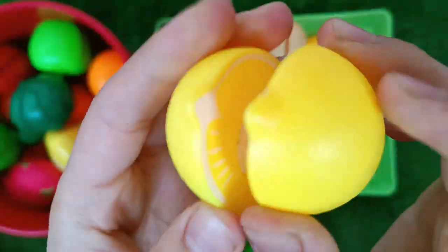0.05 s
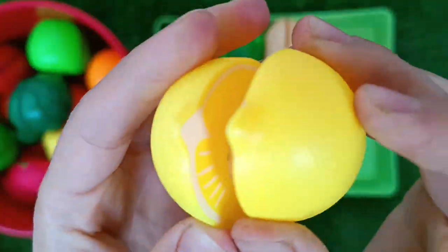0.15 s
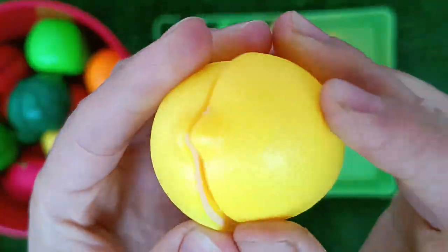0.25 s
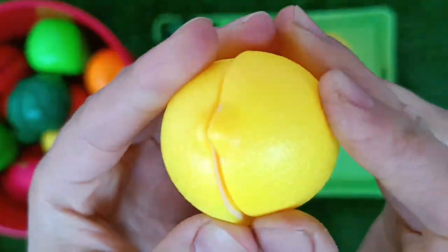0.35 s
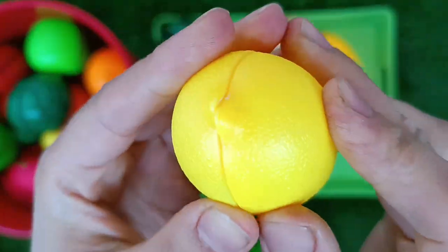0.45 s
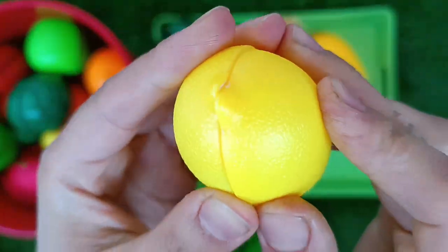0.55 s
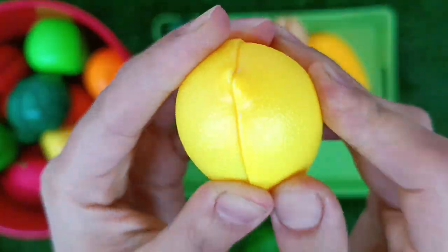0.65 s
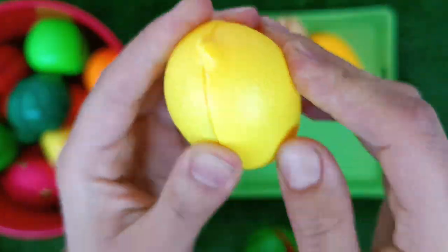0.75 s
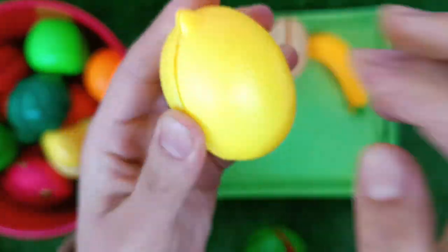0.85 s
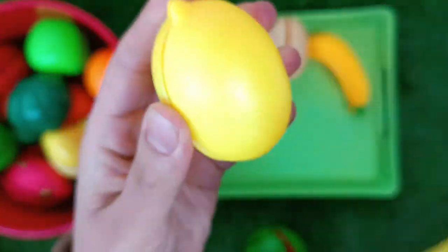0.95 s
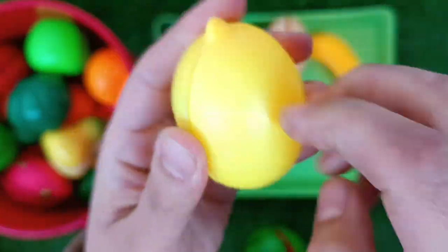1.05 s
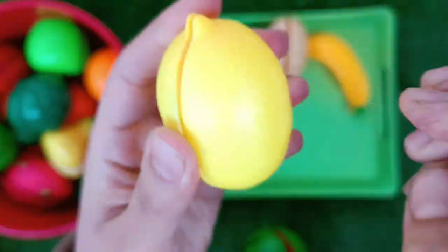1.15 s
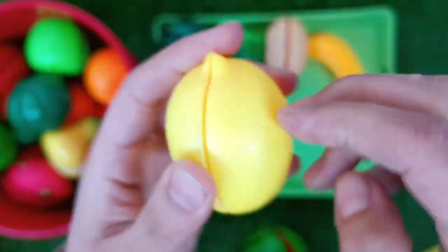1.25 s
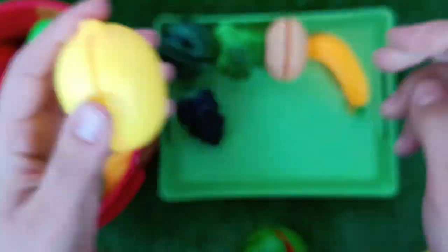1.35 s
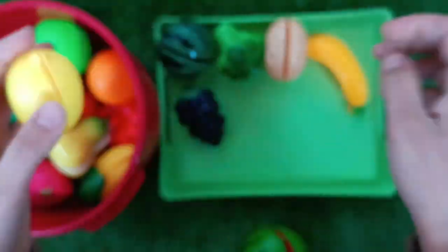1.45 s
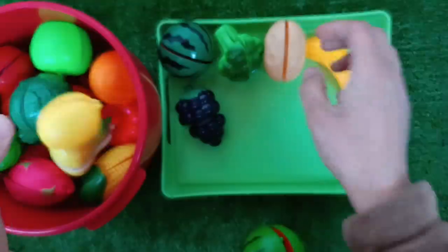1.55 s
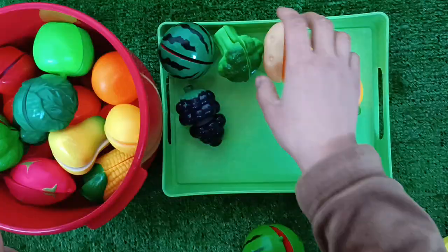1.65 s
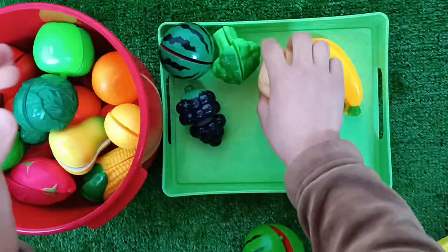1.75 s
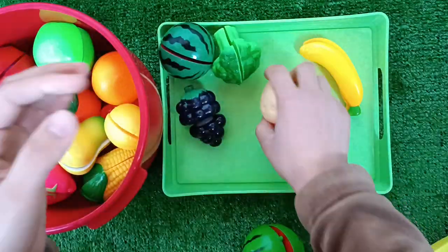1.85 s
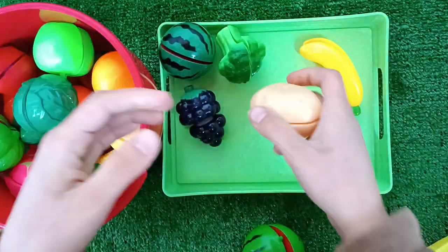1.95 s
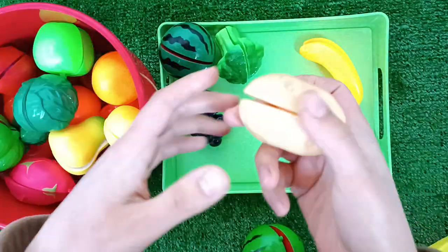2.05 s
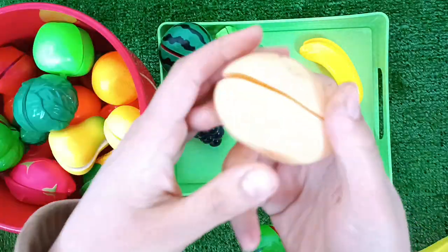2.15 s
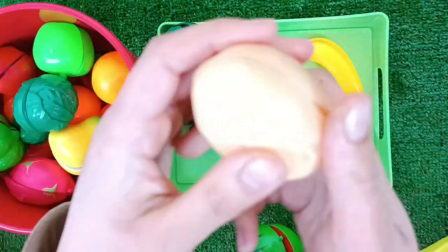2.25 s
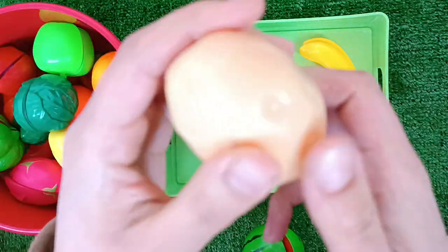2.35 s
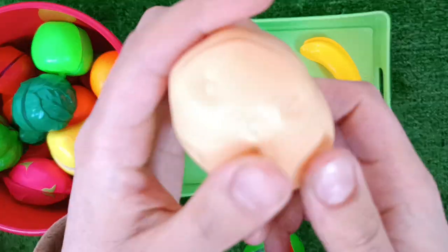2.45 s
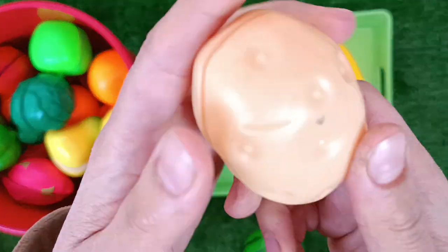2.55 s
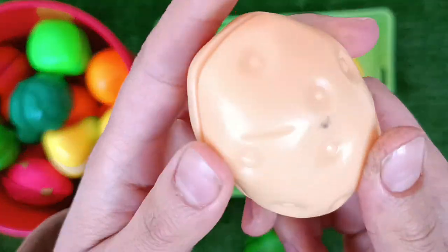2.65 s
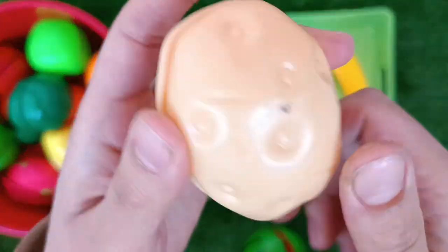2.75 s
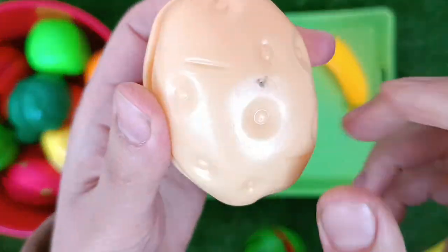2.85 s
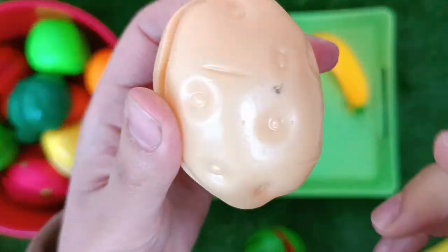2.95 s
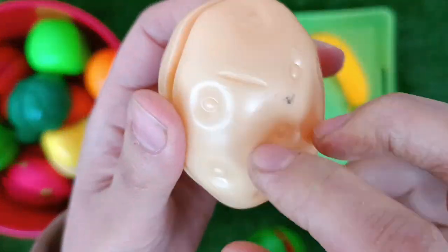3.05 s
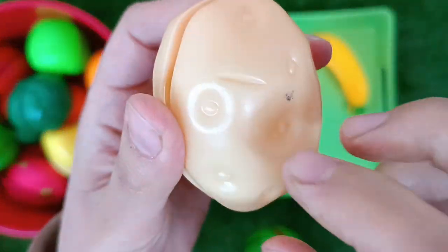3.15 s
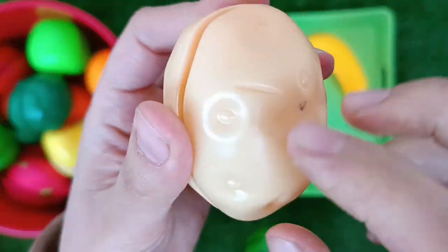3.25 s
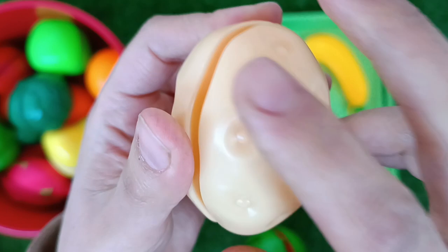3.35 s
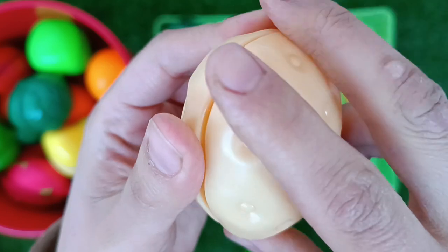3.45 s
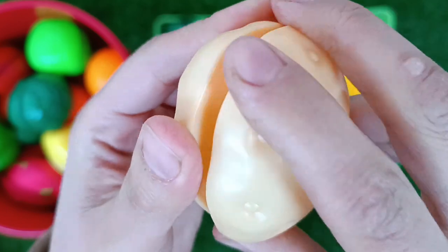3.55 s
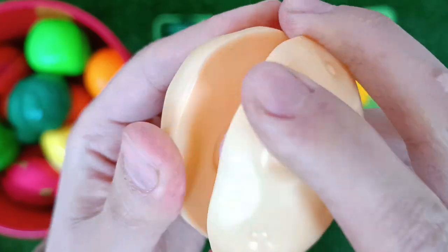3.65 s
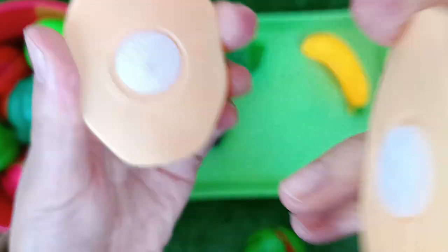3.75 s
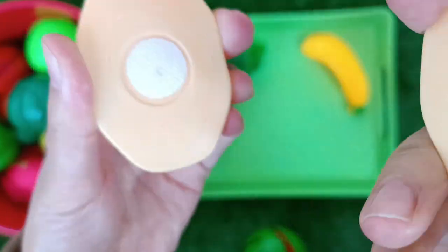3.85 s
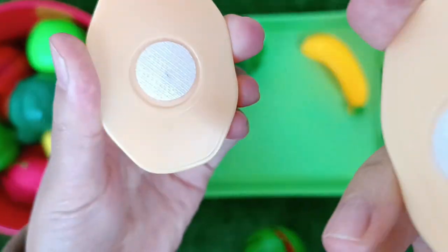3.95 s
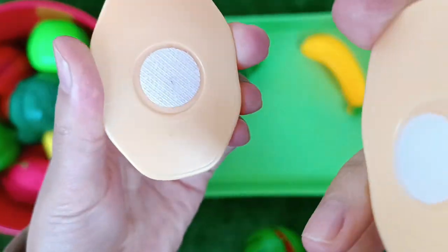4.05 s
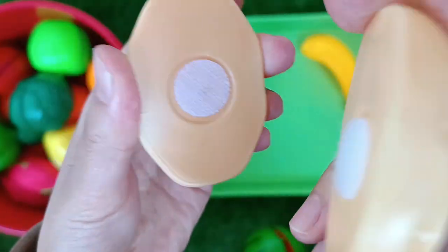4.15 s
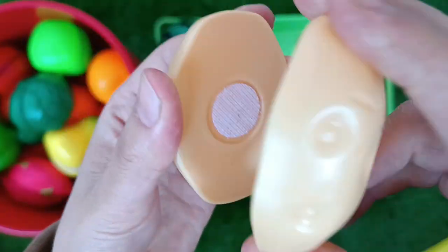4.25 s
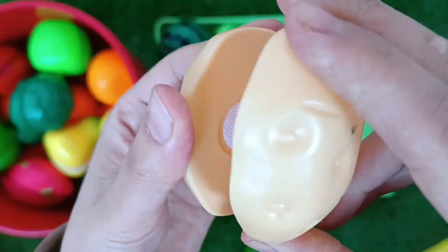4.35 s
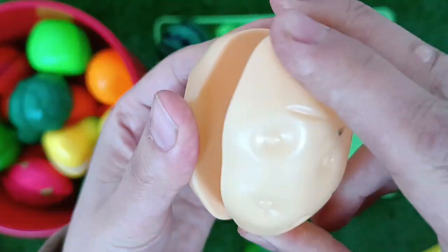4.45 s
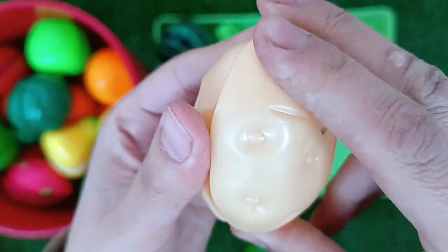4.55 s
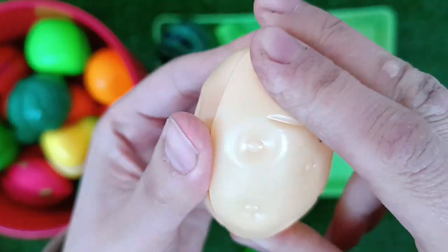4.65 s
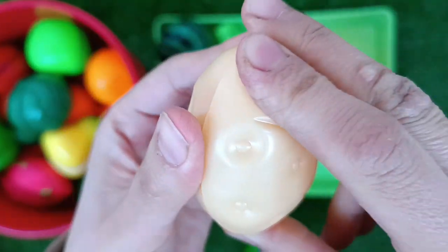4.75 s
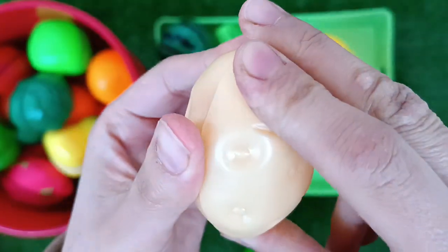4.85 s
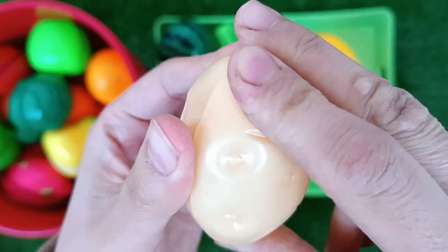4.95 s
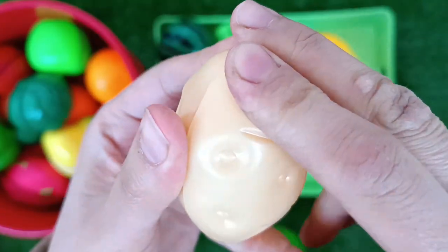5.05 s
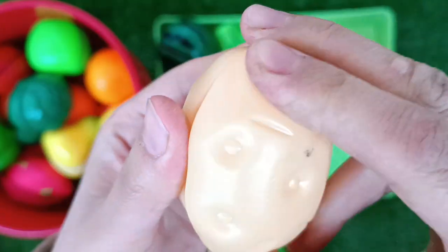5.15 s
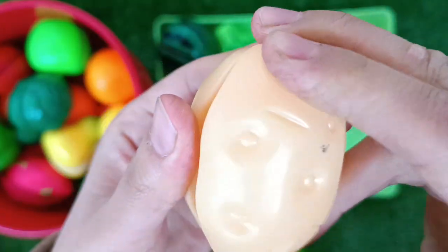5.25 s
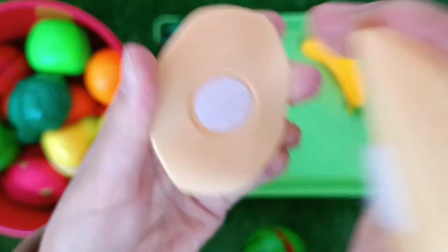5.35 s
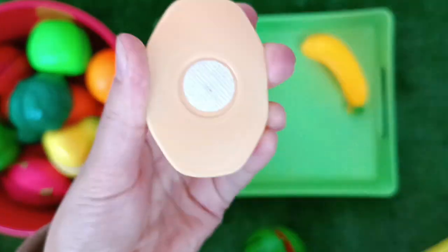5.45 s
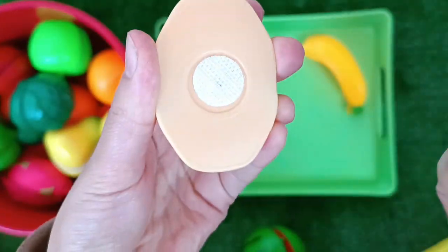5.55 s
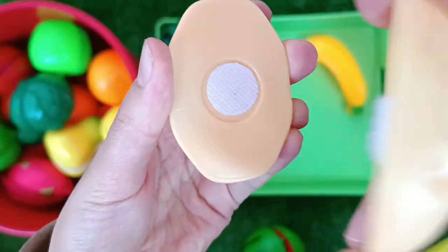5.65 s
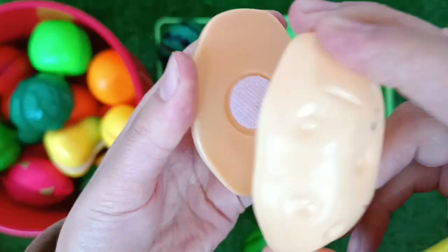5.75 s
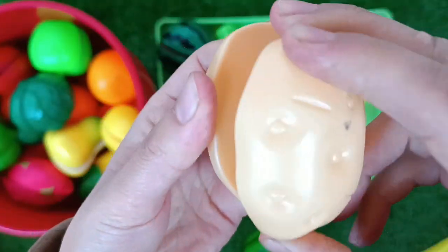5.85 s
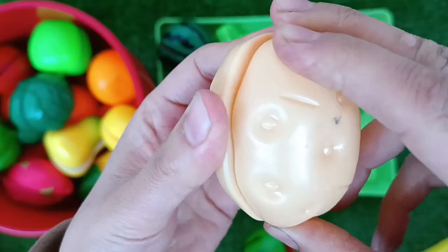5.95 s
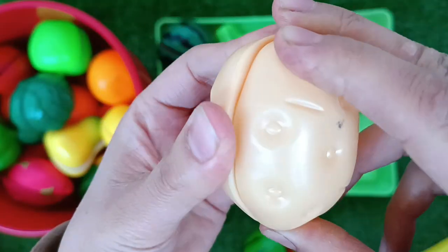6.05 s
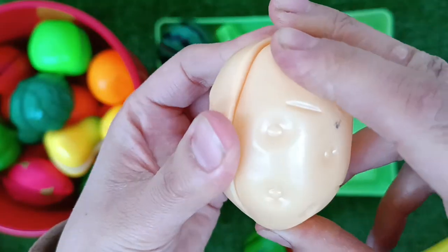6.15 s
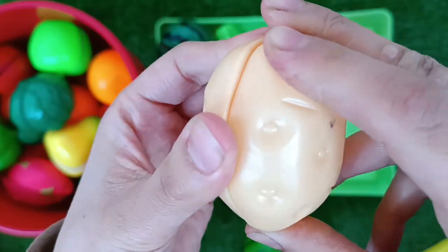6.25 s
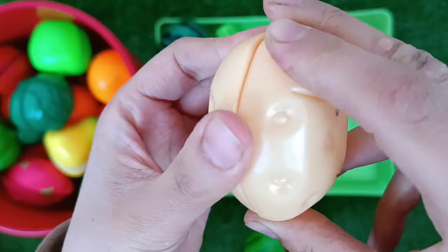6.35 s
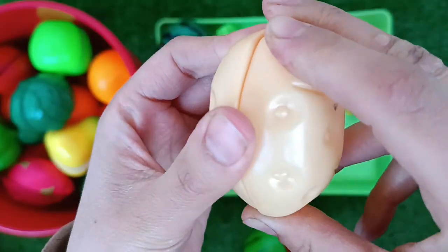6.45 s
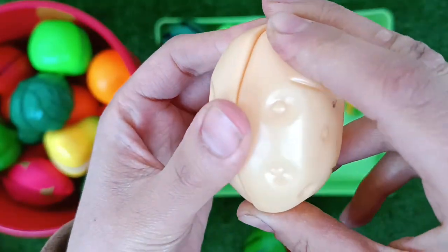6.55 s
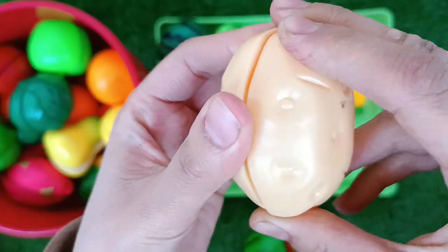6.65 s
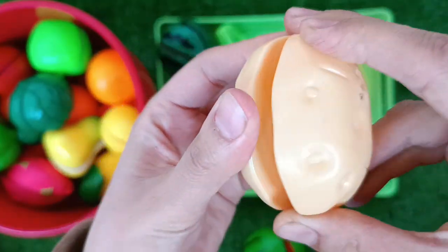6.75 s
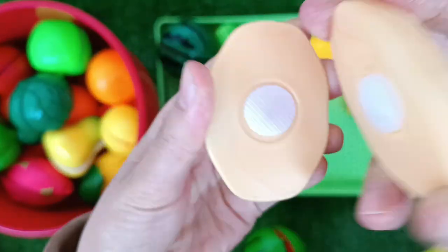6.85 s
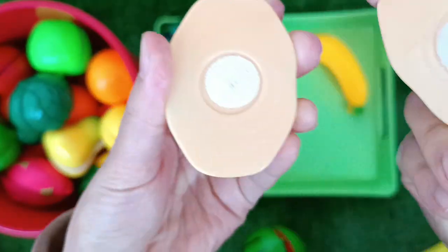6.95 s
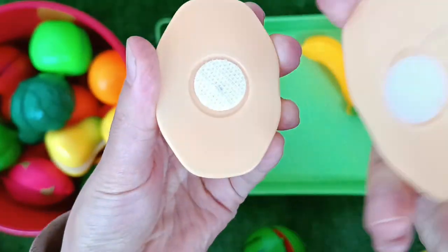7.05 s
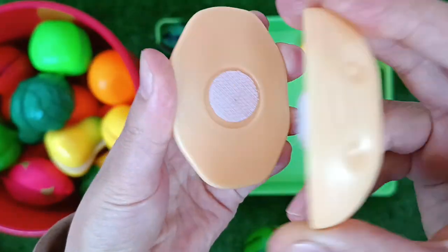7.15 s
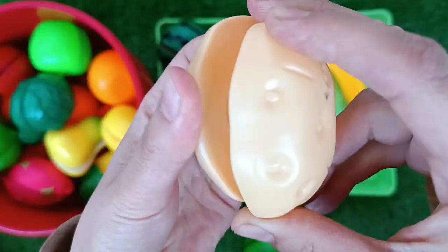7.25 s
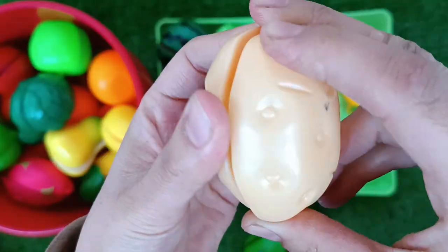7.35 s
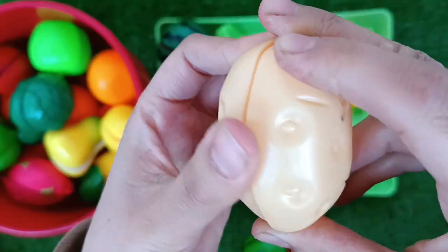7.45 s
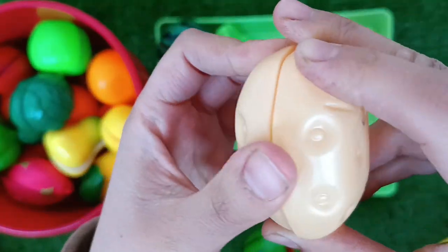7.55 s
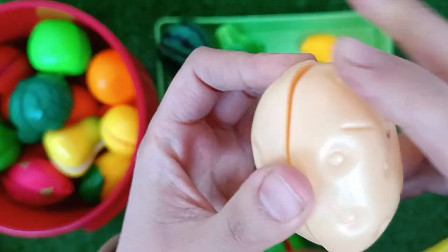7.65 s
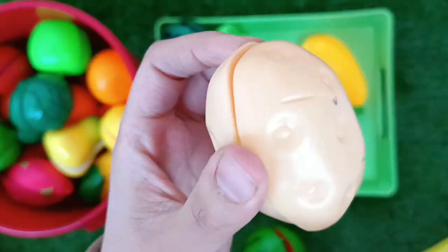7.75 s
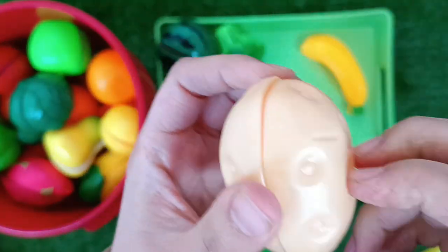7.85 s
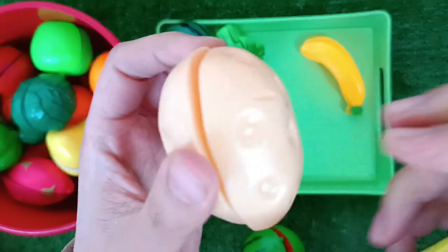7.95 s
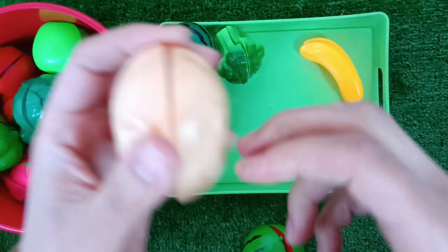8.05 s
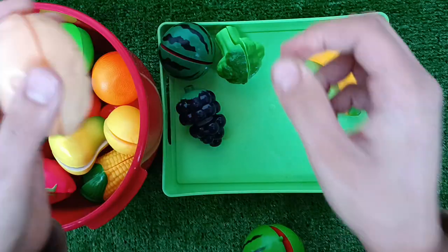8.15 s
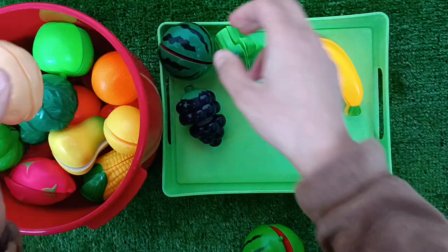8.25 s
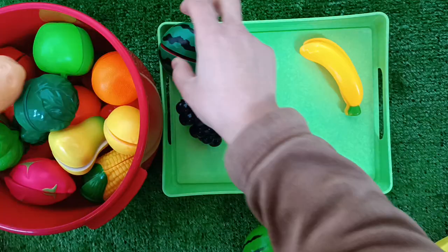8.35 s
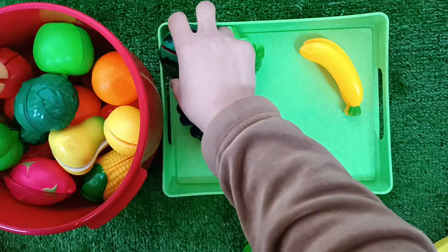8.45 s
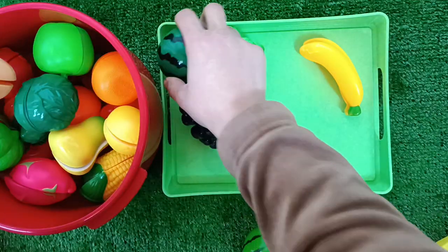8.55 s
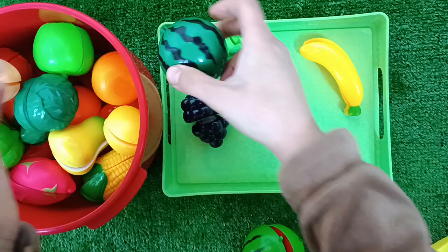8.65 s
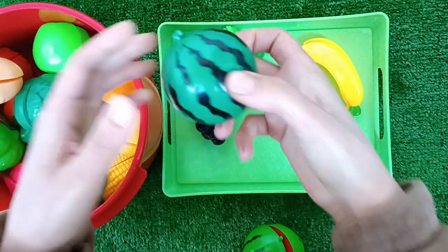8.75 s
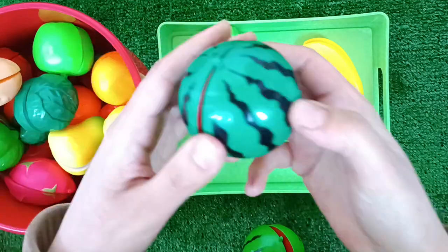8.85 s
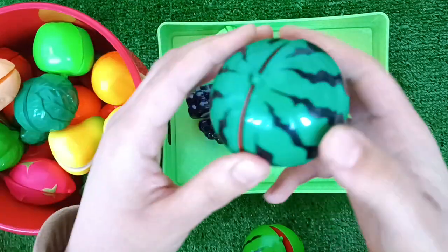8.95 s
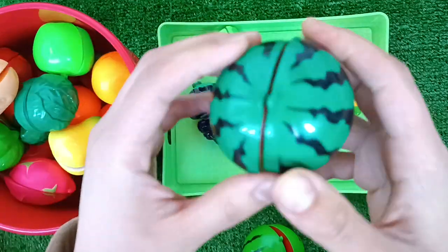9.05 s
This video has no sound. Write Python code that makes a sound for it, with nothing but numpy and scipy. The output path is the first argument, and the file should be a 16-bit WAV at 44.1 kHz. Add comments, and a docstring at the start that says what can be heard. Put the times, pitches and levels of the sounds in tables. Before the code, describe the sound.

Hands tap, drop and snap apart hollow plastic toy food up close; brief crackling fastener tears, sharp clicks, faint distant traffic behind.

```python
"""Small room: hands tap, rub and pull apart hollow plastic toy fruit close to a phone with two ports.
Knocks, pieces dropped into a basket and tearing hook-and-loop pads are damped shell modes with a crack
and a thud; rubbing is clumped noise impulses, a sliding fingertip band-passed hiss.
The room answers with sparse decaying echoes. Outside: far traffic, a faint horn, still air, wavering tones.
Capture adds a limiter, a noise suppressor and a band limit."""
import sys
import numpy as np
from scipy import signal
from scipy.fft import rfft, irfft, next_fast_len
from scipy.io import wavfile
from scipy.ndimage import uniform_filter1d

SR = 44100
rng = np.random.default_rng(int(sys.argv[2]) if len(sys.argv) > 2 else 0)


def digitize_waveform(pressure):
    """Quantize a signal to 16-bit integers and store it at the path in sys.argv[1].

    Rows of a 2-D input are taken as channels; values are limited to [-1, 1].
    """
    field = np.atleast_2d(pressure).T
    bounded = np.clip(field, -1, 1)
    quanta = np.round(bounded * 32767).astype(np.int16)
    wavfile.write(sys.argv[1], SR, quanta)


N = 400428

USUAL_LAG_SAMPLES = 9  # right port hears later
PAN_DB_PER_SAMPLE = 0.35  # left-right level difference per sample of lag


def gain_of(db):
    """Amplitude factor of a level in dB."""
    return 10 ** (np.asarray(db) / 20)


def evened(x):
    """Scales to RMS 1."""
    return x / np.sqrt(np.mean(x ** 2) + 1e-20)


def read(points, hz):
    """Interpolates a (hz, value) curve over log frequency."""
    point_hz, value = np.transpose(points)
    return np.interp(np.log(hz + 1), np.log(point_hz + 1), value)


def equalized(x, points):
    """Zero-phase filter with a (hz, level_db) curve."""
    size = next_fast_len(N)
    gain = gain_of(read(points, np.fft.rfftfreq(size, 1 / SR)))
    return irfft(rfft(x, size) * gain, size)[..., :N]


def coloured(x, points):
    """Filtered by a spectrum, then scaled to RMS 1."""
    return evened(equalized(x, points))


def smooth_noise(count, width_samples):
    """Slow random curve of RMS 1: moving average of noise."""
    return evened(uniform_filter1d(rng.standard_normal(count), width_samples))


def add(mix, start_s, sound):
    """Adds a sound in place, cut at the end of the mix."""
    part = mix[:, round(start_s * SR):][:, :sound.shape[1]]
    part += sound[:, :part.shape[1]]


def toys():
    """All blows and tearing hooks as left, right and room feed; each blow rebounds once, softer."""
    # knocks of nails and toys on hollow shells: start_s, level_db, main_ring_hz, thud_db, brightness_db
    knocks = [(0.3475, -16.5, 1650, -60, -6.5), (.445, -36, 2180, -42, 10.5), (.473, -33, 2260, -47, 7.5),
              (0.519, -23.5, 2170, -38, -1.5), (0.568, -42, 2480, -28, 11.5),
              (0.6287, -26, 2180, -13.5, -4.5), (0.6501, -27.5, 2156, -23, 3),
              (0.697, -54.5, 2800, -4, 20.5), (0.8733, -36.5, 2310, -11, 0),
              (0.898, -33, 1994, -0.5, -11.5), (1.0367, -38.5, 2948, -27, 12), (1.139, -6.5, 1835, -7, -2),
              (1.3016, -14.5, 1682, -10, 3), (1.6286, 5, 1550, -24, 2), (1.6332, -6.5, 2540, -13.5, -3),
              (1.646, -17, 1530, -25.5, -11), (1.6901, -14.5, 2179, -11.5, 1),
              (1.7245, -6, 1440, -13.5, -4), (1.7321, -10.5, 1552, -12.5, -14.5),
              (1.8037, -6.5, 1436, -19.5, -9), (1.8125, -6, 1220, -23.5, -15),
              (1.9826, -31, 2450, -4.5, -23.5), (1.9919, -12.5, 987, -22.5, -25),
              (2.081, -14.5, 970, -48, -26), (2.113, -31, 1180, -12, 1), (2.1536, -18.5, 1040, -27, -26),
              (2.2288, -20.5, 900, -27.5, -29), (2.2714, -25.5, 941, -16, -17),
              (2.3085, -16, 1385, -54, -7.5), (2.3756, -30, 1052, -45, -19),
              (2.5583, -21.5, 1686, -21.5, -12.5), (2.8008, -27.5, 1668, -32.5, -4),
              (3.135, -3.5, 1350, -24, -2), (3.28, -23, 1175, -9.5, -1.5), (3.3792, -39.5, 1582, -27, 0),
              (3.4096, -39, 2950, -6, 12), (3.5036, -12.5, 1782, -95, -5), (4.1773, -34.5, 1137, -22, -2),
              (4.636, -9.5, 1701, -34, -8.5), (4.7866, -34.5, 1847, -29, -6), (4.803, -21, 2170, -52, -4),
              (4.8448, -37.5, 2545, -20.5, 18), (5.996, -39.5, 1116, -46, -5),
              (6.1001, -36.5, 1692, -28, -0.5), (6.4708, -46, 1960, 0, -16.5),
              (6.5379, -22.5, 1335, -8.5, -8), (7.3258, -9, 1260, -53, -13.5),
              (7.4111, -32.5, 1830, -40, 0), (7.471, -34.5, 1900, -33, -8), (7.683, -37, 1980, -12.5, -7.5),
              (7.712, -37, 1110, -9, -2), (7.9205, -5.5, 1435, -14, -5), (8.084, 1.5, 1782, -22.5, -2),
              (8.389, 1.5, 1277, -19.5, -1), (8.395, -7.5, 2020, -14.5, 7.5), (8.4556, -10, 1057, -10, -2),
              (8.5117, -4.5, 1157, -13.5, -11.5), (8.538, -19, 2340, -2.5, -7),
              (8.5865, -12.5, 2210, -10.5, -10.5), (8.7566, -30, 1155, -6.5, -5),
              (8.785, -35.5, 830, -8, -17), (8.8407, -21.5, 1075, -43, -29), (8.8615, -33, 733, -21, -14),
              (8.903, -33, 2270, -34, -7), (8.9364, -8.5, 2215, -56, -15.5),
              (9.065, -34.5, 1000, -50, -6.5)]
    # upper modes of a closed shell: mode_hz, level_db, t60_s
    shell_modes = [(2860, 0, 0.019), (3153, -0.5, 0.0053), (4146, 7, 0.004), (5490, 0, 0.013),
                   (6778, 3, 0.015), (9180, -6, 0.03), (13590, 7, 0.015)]
    # upper modes of the opened halves: mode_hz, level_db, t60_s
    half_modes = [(2830, -2.5, 0.027), (3380, 7, 0.0071), (3966, 3.5, 0.0077), (5460, -2, 0.0025),
                  (6900, -2.5, 0.012), (9100, -22, 0.0076), (13984, -8, 0.0099)]
    # where the hands work (phone, basket, tray): time_s, right_lag_samples, room_db
    place = [(1.5, 10.6, 7), (1.65, 11.7, 0.5), (1.759, 15, 10.5), (1.901, 0.78, -7), (2.281, 3.8, 5),
             (2.4, 9.5, 2.5), (3, 9.5, 0.5), (8.301, 8, 2.5), (8.45, 15.8, 4.5), (8.55, 19.2, 9.5),
             (8.7, 5, 11.5), (8.9, 4.6, 3.5)]
    bounce_db, bounce_max_s = -13, .012
    room_db_per_db = 0.05  # softer knocks ring less in the room
    top_db, top_hz, hz_per_db = -4, 1250, 22  # strongest hooks; weaker ones ring higher
    bright_db, dulling_db_per_db, bright_max_db = -3, 0.36, 2  # weaker hooks are brighter
    out = np.zeros((3, N))
    place_s, lags, rooms_db = np.transpose(place)
    for start_s, *blow_settings in knocks:
        lag = np.interp(start_s, place_s, lags)
        room_db = np.interp(start_s, place_s, rooms_db) + room_db_per_db * blow_settings[0]
        blow = knock(*blow_settings, lag, shell_modes, room_db)
        add(out, start_s, blow)
        add(out, start_s + bounce_max_s * rng.uniform(0.24, 1), gain_of(bounce_db) * blow)
    for start_s, db in hooks():
        above_db = db - top_db
        hook_bright_db = min(bright_db - dulling_db_per_db * above_db, bright_max_db)
        hz = (top_hz - hz_per_db * max(above_db, -18)) * rng.uniform(.92, 1.15)
        add(out, start_s, knock(db, hz, -22, hook_bright_db, USUAL_LAG_SAMPLES, half_modes, room_db=0.5))
    return out


def knock(db, hz, thud_db, bright_db, lag_samples, modes, room_db):
    """A blow: main ring with neighbours, upper modes, crack and low thud; rows left, right, room feed."""
    crack_db = -4.5
    body = ring(hz * np.array([1, .55, .8, 1.45, 2.1]), np.array([0, -21, -8, -5, -7]),
                np.array([.008, .006, .006, .006, .005]), rise_s=.0004)
    upper = ring(*np.transpose(modes), rise_s=.0002) + gain_of(crack_db) * crack()
    thud = ring(np.array([154, 231, 367, 436]), np.array([-6.5, 4.5, -5.0, -0.5]), .035, rise_s=0.00039)
    highpass = signal.butter(2, .6 * hz, "high", fs=SR)
    shell = signal.lfilter(*highpass, body + gain_of(bright_db) * upper)
    sound = np.pad(shell + gain_of(thud_db) * thud, (4, 20))  # room for the lag
    side = gain_of(.5 * PAN_DB_PER_SAMPLE * lag_samples)
    right = np.roll(sound, round(lag_samples)) / side
    return gain_of(db) * np.array([side * sound, right, gain_of(room_db) * sound])


def ring(hz, db, t60_s, rise_s):
    """Each mode is a cluster of five damped neighbours of random phase; peak 1."""
    t = np.arange(2048)[:, None] / SR
    hz, db, t60_s = (np.tile(v * np.ones(len(hz)), reps=5) for v in (hz, db, t60_s))
    level_spread, pitch_spread, phase = rng.standard_normal((3, len(hz)))
    decay = gain_of(db + level_spread - 60 * t / t60_s)
    x = decay * np.sin(2 * np.pi * hz * (1 + .06 * pitch_spread) * t + 1.81 * phase)
    x = x.sum(1) * (1 - np.exp(-t[:, 0] / rise_s))
    return x / abs(x).max()


def crack():
    """Broadband crack of contact: decaying treble noise, peak 1."""
    t60_s = 0.019
    x = signal.lfilter([1, -1], [1, -.65], rng.standard_normal(2048))
    x = x * gain_of(-60 * np.arange(2048) / SR / t60_s)
    return x / abs(x).max()


def hooks():
    """(start_s, level_db) of every hook: single snaps, then each run, unevenly spaced."""
    # single hooks letting go before a pad tears, and the last to hold: start_s, level_db
    snaps = [(3.6151, -29), (3.6276, -21.5), (3.6393, -33.5), (3.6757, -9.5), (3.7054, -26), (3.7182, -8),
             (3.7266, -1), (3.7343, -15), (3.7865, -10.5), (5.2126, -24.5), (5.2343, -29.5),
             (5.2669, -12.5), (5.2858, -18.5), (5.3444, -6), (5.4057, 0), (6.7539, -29), (6.8079, -11.5),
             (6.8233, -26.5), (6.8397, -10), (6.8923, -14.5), (6.904, -5)]
    # runs of hooks tearing in quick succession: start_s, length_s, first_db, last_db
    tears = [(3.744, .038, -9.5, -0.5), (5.346, .049, -16.5, 0.5), (6.767, 0.021, -26.5, -23.5),
             (6.848, 0.033, -12, -3.5)]
    hooks_per_s, spread_db = 230, 2.5
    rows = list(snaps)
    for start_s, length_s, first_db, last_db in tears:
        shift, size = rng.random((40, 2)).T - .5
        along = (np.arange(40) + .5 + .7 * shift) / hooks_per_s / length_s  # 0 to 1 over the run
        db = first_db + (last_db - first_db) * along + 2 * spread_db * size
        rows += list(zip(start_s + along * length_s, db))[:round(length_s * hooks_per_s)]
    return rows


def rubbing():
    """Skin and loose hooks rub plastic: dense tiny slips of uneven size, in clumps, stroke by stroke."""
    # rubbing spectrum: frequency_hz, density_db
    rub_colour = [(200, -30), (700, -9), (1200, -8.5), (1800, 2), (2700, -5), (3300, -10.5), (4200, -4),
                  (4900, -10), (5700, -3.5), (6300, -8), (7000, -4.5), (9000, -11.5), (16500, -10)]
    slips_per_s, split_hz = 3500, 3000
    dull, bright = contact()
    clumps = gain_of(2.5 * smooth_noise(N, 300))
    sizes = gain_of(3.0 * np.minimum(rng.exponential(1, N), 4))
    slips = rng.standard_normal(N) * sizes * (rng.random(N) < slips_per_s / SR)
    x = coloured(slips * clumps, rub_colour)
    scuff = signal.sosfilt(signal.butter(4, split_hz, fs=SR, output="sos"), x)
    scratch = signal.sosfilt(signal.butter(4, split_hz, "high", fs=SR, output="sos"), x)
    x = gain_of(-3.0) * (dull * evened(scuff) + bright * evened(scratch))
    side = gain_of(.5 * PAN_DB_PER_SAMPLE * USUAL_LAG_SAMPLES)
    return np.array([side * x, np.roll(x, USUAL_LAG_SAMPLES) / side, x])


def contact():
    """Dull and bright gain of all strokes: quick press, hold, steady fade; the scratch tires sooner."""
    # strokes: full_contact_s, hold_s, dull_scuff_db, bright_scratch_db, fade_db_per_s
    strokes = [(.338, .01, -57.5, -60, 300), (0.458, 0.046, -46, -55, 200), (.52, .2, -59.5, -56.5, 152),
               (.8, .05, -64.5, -60.5, 203.5), (0.859, 0.022, -63.5, -48.5, 216.5),
               (1.034, .005, -57, -55.5, 301), (1.515, 0.0085, -54.5, -53.5, 292),
               (1.667, 0.15, -27, -33.5, 247), (1.91, 0.048, -53, -56.5, 198),
               (1.994, 0.0092, -36.5, -55.5, 590), (2.098, .005, -42, -63, 897),
               (2.13, .05, -54, -52.5, 297.5), (2.22, 0.065, -51, -53, 150.5),
               (2.38, 0.12, -54.5, -55.5, 164), (2.787, .04, -61.5, -57, 302),
               (3.418, 0.018, -53, -46.5, 504.5), (3.499, .01, -51.5, -55, 300),
               (3.6, 0.068, -55.5, -56, 300.5), (4.626, .01, -55, -58, 297), (4.774, .07, -52, -53.5, 399),
               (5.209, 0.015, -35.5, -46.5, 505), (5.995, 0.034, -49.5, -56, 301.5),
               (6.082, 0.11, -60.5, -54, 348), (6.282, 0.014, -75, -54.5, 400),
               (6.328, 0.0056, -69, -61, 399), (6.719, .04, -54, -66, 299.5), (7.36, .1, -47.5, -51, 124),
               (7.54, 0.052, -51, -58.5, 199.5), (7.684, .02, -44.5, -50.5, 280),
               (8.3, 0.048, -69.5, -57.5, 292.5), (8.437, 0.126, -36.5, -37.5, 245),
               (8.64, 0.08, -46.5, -54.5, 306), (8.774, 0.19, -50, -67, 315),
               (8.937, 0.0048, -58, -56, 178), (9.03, 0.028, -61.5, -54.5, 300)]
    press_db_per_s, scratch_wear_db_per_s = 600.5, 30.5
    t, out = np.arange(N) / SR, np.zeros((2, N))
    for start_s, hold_s, dull_db, bright_db, fade in strokes:
        press_db = -press_db_per_s * np.maximum(start_s - t, 0)
        db = press_db - fade * np.maximum(t - start_s - hold_s, 0)
        wear_db = scratch_wear_db_per_s * np.maximum(t - start_s, 0)
        out += gain_of([dull_db + db, bright_db + db - wear_db])
    return out


def slide():
    """A fingertip slides smoothly over a shell: even hiss in two bands."""
    # the slide: start_s, length_s, level_db
    start_s, length_s, db = (6.378, .085, -57)
    # bands of its hiss: low_hz, high_hz, level_db
    bands = [(1650, 2300, 0), (2600, 3200, -4)]
    noise, out = rng.standard_normal(round(length_s * SR)), np.zeros((3, N))
    hiss = np.zeros(len(noise))
    for low_hz, high_hz, band_db in bands:
        bandpass = signal.butter(2, (low_hz, high_hz), "band", fs=SR, output="sos")
        hiss += gain_of(band_db) * evened(signal.sosfilt(bandpass, noise))
    add(out, start_s, np.ones((3, 1)) * gain_of(db) * signal.windows.tukey(len(hiss), .3) * hiss)
    return out


def room(x):
    """Sparse random-sign echoes, partly shared by both ports; decay rate depends on frequency."""
    # decay, reached at 60 dB down on the slowed clock below: frequency_hz, decay_s
    decay = [(250, 0.1), (1000, 0.21), (4000, 0.19), (7000, 0.16), (10000, 0.13), (15000, 0.11)]
    hold_s, bend = 0.089, 0.71  # clock runs at 0.35 speed until hold_s; bend < 1 flattens late decay
    taps = np.zeros((2, SR // 2))
    at = np.arange(120, SR // 2 - 20, 20)
    at = at + rng.integers(0, 20, (2, len(at)))
    np.put_along_axis(taps, at, rng.choice([-1., 1.], at.shape), 1)
    hz, t, z = signal.stft(taps, SR, nperseg=256)
    clock_s = np.maximum(t - hold_s, 0) + .35 * np.minimum(t, hold_s)
    fade = gain_of(-60 * (clock_s / read(decay, hz)[:, None]) ** bend)
    tail = signal.istft(z * fade, SR, nperseg=256)[1]
    tail[1] = .35 * np.roll(tail[0], USUAL_LAG_SAMPLES // 2) + .8 * tail[1]
    return signal.fftconvolve(x[None], tail / np.linalg.norm(tail[0]), axes=1)[:, :N]


def traffic():
    """Far traffic: swells of rumble noise with a wavering, sagging hum."""
    # swells: loudest_s, half_length_s, hum_hz, hum_db, rumble_db
    swells = [(0.499, 0.98, 107.5, -75.5, -78), (1.409, .3, 107.9, -56.5, -53.5),
              (2.29, .8, 99.6, -71.5, -76.5), (3.502, 0.51, 95.9, -62, -67), (4.2, 0.67, 97.56, -72, -72),
              (5.45, 0.16, 92, -69.5, -65), (6.411, 0.27, 89.9, -65.5, -71),
              (7.145, 0.35, 76.3, -55.5, -74), (8.034, .1, 75.6, -69.5, -52.5),
              (8.724, .3, 65.95, -58.5, -70)]
    # rumble spectrum: frequency_hz, density_db
    rumble = [(12, -60.5), (20, -29), (65, -0.5), (103, 3.5), (130, -17), (216, -1.5), (364, -25.5),
              (404, -19), (700, -30), (910, -71.5), (1540, -120)]
    steady_db, sag_hz_per_s = -69, 1.2
    fade_db = 10  # drop at a half length from the loudest
    t, strength, hum = np.arange(N) / SR, gain_of(steady_db), np.zeros(N)
    for loudest_s, half_s, hz, hum_db, rumble_db in swells:
        since = t - loudest_s
        swell = gain_of(-fade_db * (since / half_s) ** 2)
        strength = np.hypot(strength, gain_of(rumble_db) * swell)
        hum += gain_of(hum_db) * swell * np.sin(2 * np.pi * (hz - .5 * sag_hz_per_s * since) * since)
    a, b = rng.standard_normal((2, N))
    waver = 1 + 0.9 * smooth_noise(N, 1500)
    gusts = gain_of(0.83 * smooth_noise(N, 6000))
    noise = coloured(np.array([a, .7 * a + .6 * b]), rumble)
    return strength * gusts * noise + np.sqrt(2) * waver * hum


def horn():
    """A faint horn: harmonics that flutter independently, from echoes of the street."""
    # loudness curve: time_s, level_db
    envelope = [(1.2, -85), (1.38, -49.5), (1.5, -56), (1.62, -65), (1.7, -64)]
    # harmonics: multiple, level_db
    harmonics = [(1, -13.5), (2, -7), (3, -12.5), (4, -2), (5, 0), (6, 0.5), (7, -10), (8, -14), (9, -14.5)]
    pitch_hz = 412
    t, chord = np.arange(N) / SR, np.zeros(N)
    for multiple, db in harmonics:
        flutter = 1 + .45 * smooth_noise(N, 900)
        chord += gain_of(db) * flutter * np.sin(2 * np.pi * (multiple * pitch_hz * t + rng.random()))
    time_s, level_db = np.transpose(envelope)
    sounding = (t > time_s[0]) * (t < time_s[-1])
    return gain_of(np.interp(t, time_s, level_db)) * evened(chord) * sounding


def air():
    """Still air: steady coloured noise, partly shared by the ports."""
    # air spectrum: frequency_hz, density_db
    air_colour = [(180, -24), (300, -3.5), (780, -9), (1330, -5.5), (2240, -5), (3900, -19), (6780, -19),
                  (11600, -33), (13500, -34.5), (15200, -17.5), (16500, -38.5)]
    level_db = -66
    c, d = rng.standard_normal((2, N))
    return gain_of(level_db) * coloured(np.array([c, .5 * c + 0.28 * d]), air_colour)


def tones():
    """Short soft sines from afar that glide a little and waver."""
    # glides: start_s, length_s, first_hz, last_hz, level_db
    glides = [(0, 0.063, 229.7, 225, -60.5), (0.855, 0.3, 244, 222.4, -54), (2.623, 0.1, 305.4, 298, -59),
              (2.713, 0.12, 2237, 2230, -64.5), (2.874, 0.091, 221.4, 227.3, -51),
              (3.223, 0.054, 374, 365, -55.5), (7.285, 0.04, 2257, 2263, -58),
              (7.495, 0.16, 477.3, 454.7, -57), (7.633, 0.16, 427, 394, -53),
              (7.697, 0.28, 2212, 2308, -71.5), (7.931, 0.11, 232.4, 230, -51.5),
              (8.197, 0.18, 2238, 2225, -59)]
    out = np.zeros((2, N))
    for start_s, length_s, first_hz, last_hz, db in glides:
        hz = np.linspace(first_hz, last_hz, round(length_s * SR))
        waver = 1 + 0.46 * smooth_noise(len(hz), 500)
        tone = waver * signal.windows.tukey(len(hz), .6) * np.sin(2 * np.pi * np.cumsum(hz) / SR)
        add(out, start_s, np.ones((2, 1)) * gain_of(db) * tone)
    return out


def scene():
    """Near sounds coloured by the ports, their room, and the background."""
    # colour of near sound at the ports: frequency_hz, level_db
    port_colour = [(20, -41), (60, -19), (180, -12.5), (400, -1), (7500, 5.5), (9500, -3.5), (13500, -15),
                   (14800, -1), (15700, 1.5), (16500, -4)]
    room_db = -9.5
    near = equalized(toys() + rubbing() + slide(), port_colour)
    return near[:2] + gain_of(room_db) * room(near[2]) + traffic() + horn() + air() + tones()


def record(dry):
    """Limiter holds down cracks; suppressor cuts what is near the steady noise; band limit."""
    limit_db, limit_share, recovery_db_per_s = -6, 0.3, 400  # share of the excess dB removed
    gate_db, gate_floor_db, gate_from_hz = 14.5, -6.5, 500  # margin over steady noise; deepest cut
    edge_hz = 16150
    level_db = 10 * np.log10(abs(uniform_filter1d((dry ** 2).max(0), size=40)) + 1e-12)
    fall_db = np.arange(N) * recovery_db_per_s / SR
    held_db = np.maximum.accumulate(level_db + fall_db) - fall_db  # instant rise, linear fall
    over_db = np.maximum(held_db - limit_db, 0)
    limited = dry / gain_of(limit_share * uniform_filter1d(over_db, size=30))

    hz, t, z = signal.stft(limited, SR, nperseg=512, noverlap=384)
    power = uniform_filter1d((abs(z) ** 2).mean(0), size=5, axis=0)
    power = uniform_filter1d(power, size=3, axis=1) + 1e-20
    steady = np.percentile(power, 15, axis=1)[:, None]
    keep = np.maximum(1 - gain_of(2 * gate_db) * steady / power, gain_of(gate_floor_db))
    keep[hz < gate_from_hz] = 1  # bass passes
    clean = signal.istft(z * keep, SR, nperseg=512, noverlap=384)[1][:, :N]
    lowpass = signal.firwin(255, edge_hz, window=("kaiser", 9), fs=SR)
    return signal.oaconvolve(np.clip(clean, -1, 1), lowpass[None], "same")


dry = scene()
out = record(dry)
digitize_waveform(out)
```